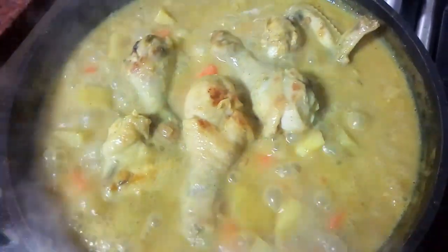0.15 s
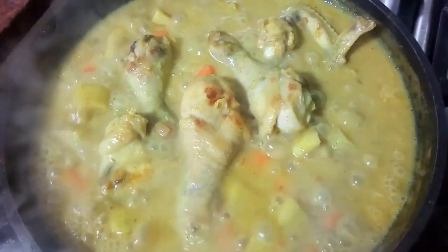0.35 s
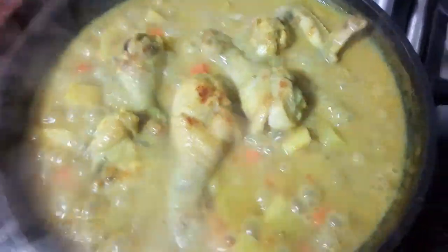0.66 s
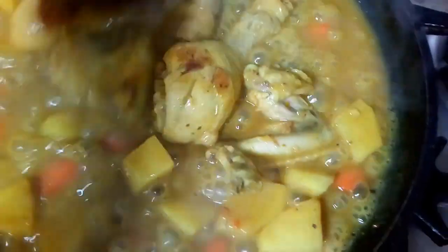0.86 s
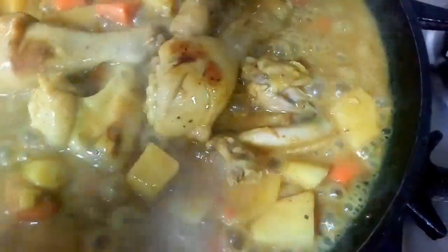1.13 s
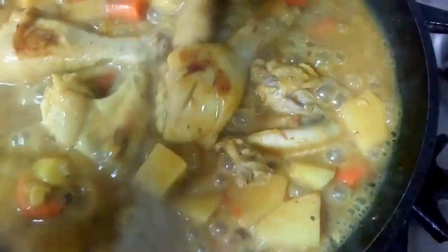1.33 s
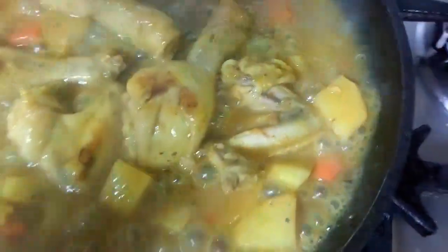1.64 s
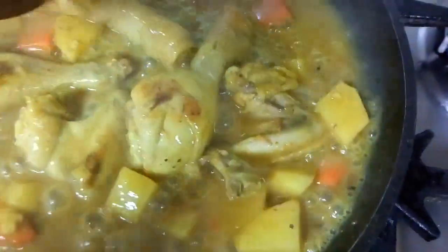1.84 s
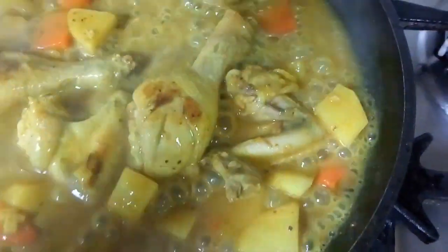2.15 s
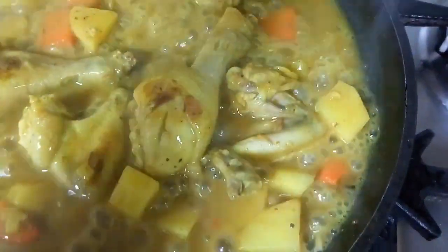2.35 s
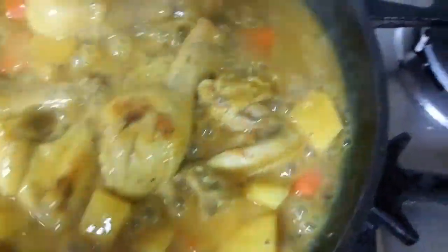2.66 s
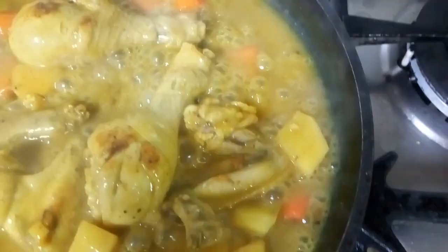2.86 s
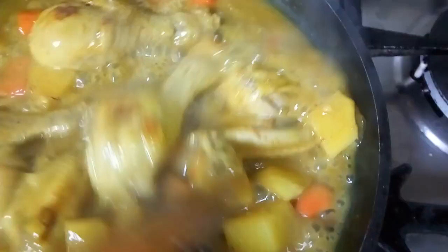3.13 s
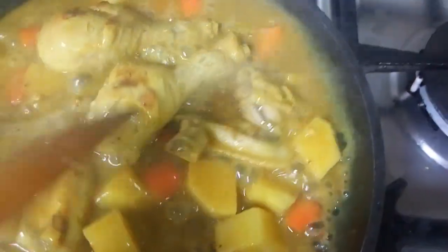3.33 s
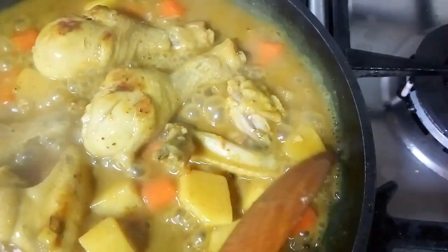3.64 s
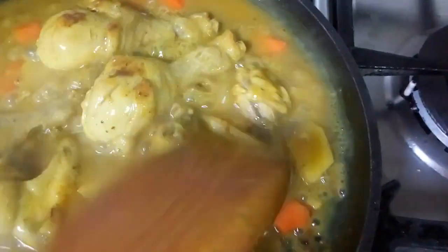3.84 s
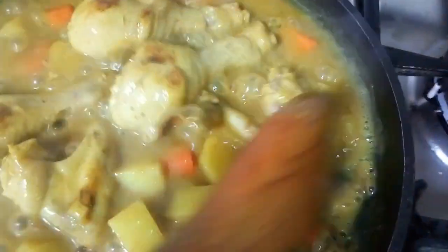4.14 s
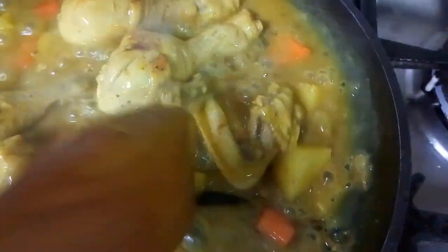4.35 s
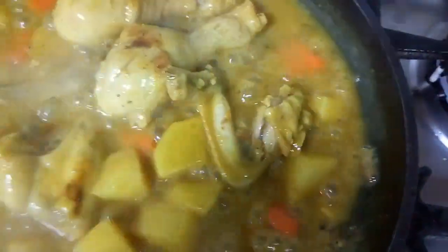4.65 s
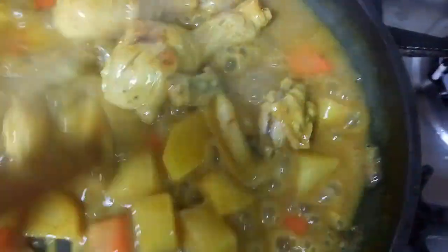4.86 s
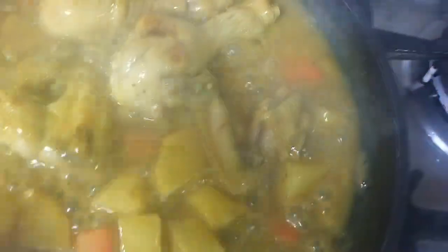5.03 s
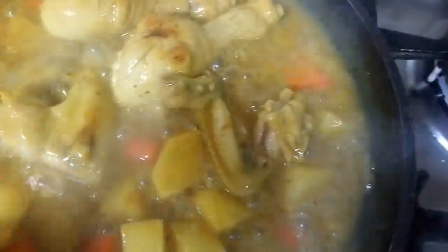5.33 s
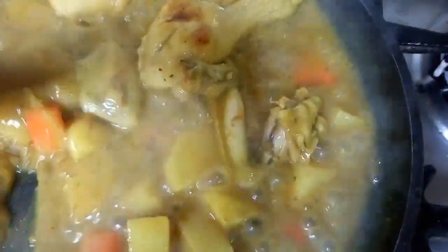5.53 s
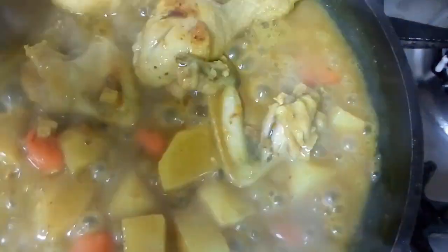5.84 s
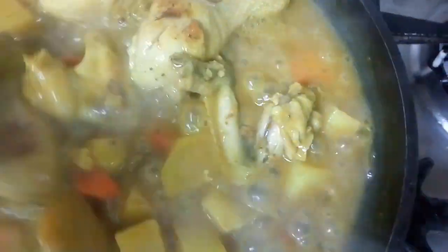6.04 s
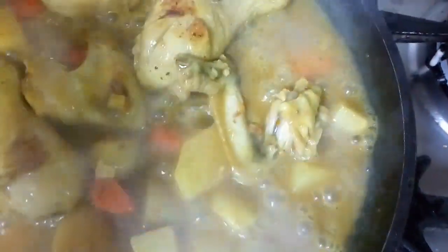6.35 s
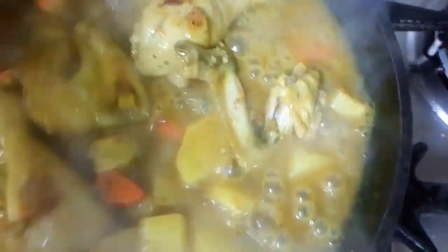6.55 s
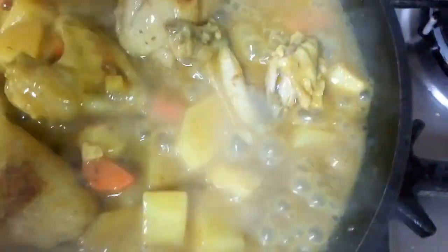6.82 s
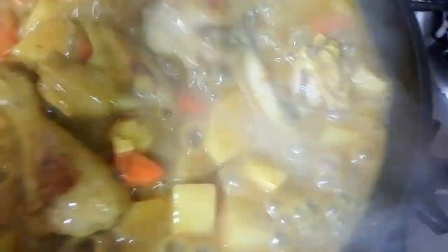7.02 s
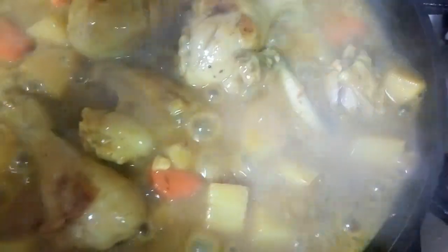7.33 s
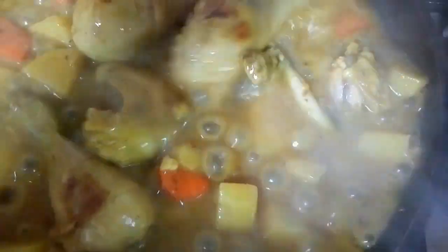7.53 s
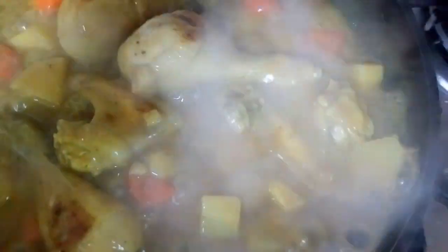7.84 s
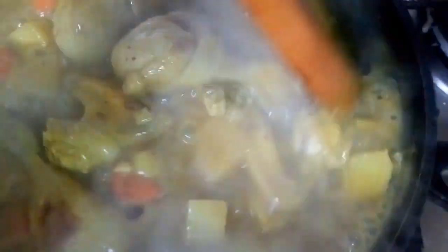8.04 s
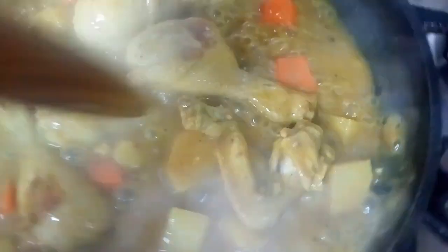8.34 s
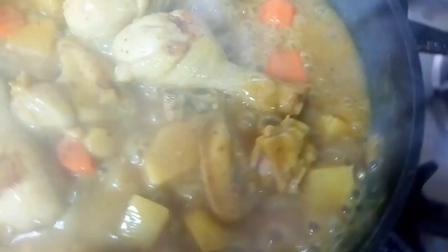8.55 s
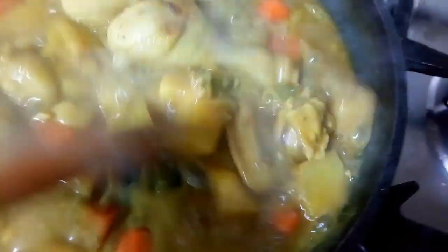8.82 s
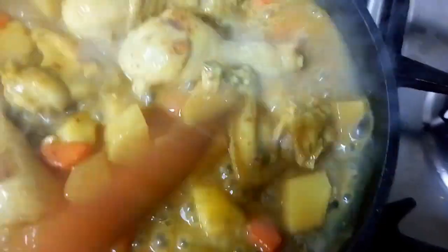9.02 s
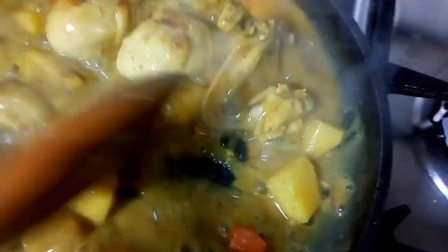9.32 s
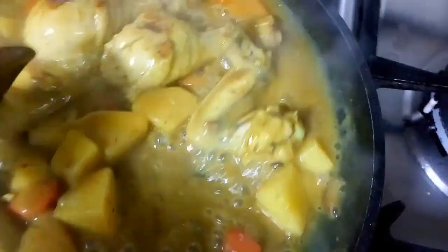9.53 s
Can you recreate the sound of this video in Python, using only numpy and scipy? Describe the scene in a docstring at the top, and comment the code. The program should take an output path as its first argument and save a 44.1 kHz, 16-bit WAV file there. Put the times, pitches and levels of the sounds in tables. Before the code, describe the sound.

Thick curry simmers in a wide pan with soft bubble pops and fizzing steam while a wooden spoon knocks dully on the pan floor.

```python
"""Thick curry simmers in a wide pan on a gas hob, close under a two-port microphone. First bubbles burst softly
and steam fizzes, as noise with grains of damped sines; single bubbles stand out. At 0.718 s the balance jumps
as if heard from nearer, and a wooden spoon begins to knock the pan floor, as ringing modes of pan and spoon, a
noise tick and diffuse ringing of pan and hob. The burble swells after firm knocks. Throughout, short flares
spit where sauce meets bared hot metal, as crackle and hiss in a narrow or broad band."""
import sys
import numpy as np
from scipy import signal
from scipy.fft import rfft, irfft, next_fast_len
from scipy.io import wavfile
from scipy.ndimage import uniform_filter1d, map_coordinates

SR = 44100
rng = np.random.default_rng(int(sys.argv[2]) if len(sys.argv) > 2 else 0)


def generate_wav(sig):
    """Save sig (samples, or channels by samples) to the path in sys.argv[1] as 16-bit PCM at SR."""
    pcm = np.round(np.clip(np.atleast_2d(sig).T, -1, 1) * 32767).astype(np.int16)
    wavfile.write(sys.argv[1], SR, pcm)


N = 426873


def amp(db):
    """dB to gain."""
    return 10 ** (np.asarray(db) / 20)


def unit(x):
    """Scale to rms 1."""
    return x / np.sqrt(np.mean(x ** 2) + 1e-20)


def along(points, hz):
    """Read (frequency, value) points on a log frequency axis."""
    point_hz, value = np.transpose(points)
    return np.interp(np.log(hz + 1), np.log(point_hz + 1), value)


def curves(rows):
    """Interpolate each column after the time to one value per sample."""
    s, *columns = np.transpose(rows)
    return [np.interp(np.arange(N) / SR, s, column) for column in columns]


def filtered(x, response):
    """Multiply the spectrum of x by a response of frequency."""
    size = next_fast_len(N + SR // 2)
    return irfft(rfft(x, size) * response(np.fft.rfftfreq(size, 1 / SR)), size)[..., :N]


def wobble(rate):
    """A smooth random curve with rate knots a second."""
    knots = rng.standard_normal(int(N * rate / SR) + 4)
    return map_coordinates(knots, [np.arange(N) * rate / SR])


# How alike diffuse sound is at the two ports: (frequency [Hz], likeness [0 to 1])
PORT_LIKENESS = [(30, 0.1), (150, 0.83), (400, 1), (1000, 0.82), (2500, 0.038), (6000, 0.015)]


def rush(patchy_db):
    """Stereo noise with time-frequency patches of random gain, most alike at the ports near 400 Hz."""
    z = signal.stft(rng.standard_normal((2, N)), nperseg=256)[2]
    field = uniform_filter1d(rng.standard_normal(z.shape[1:]), size=6, axis=0)
    field = uniform_filter1d(field, size=8, axis=1)
    pair = signal.istft(z * amp(patchy_db * unit(field)), nperseg=256)[1][:, :N]

    def mid_side_gain(hz):
        angle = np.arccos(np.clip(along(PORT_LIKENESS, hz), -1, 1)) / 2
        return np.array([np.cos(angle), np.sin(angle)])

    mid, side = filtered(pair, mid_side_gain)
    return unit(np.array([mid + side, mid - side]))


def burst(s, gain, hz, pan_db, cycles, rise, size):
    """Bubbles are damped sines with a soft start whose pitch climbs as the cavity opens."""
    turns = hz[:, None] * np.arange(size) / SR
    u = turns / cycles
    envelope = np.e * u * np.exp(-u)  # peaks at 1
    wave = gain[:, None] * envelope * np.sin(2 * np.pi * turns * (1 + rise * np.minimum(u, 4)))

    def port(side):
        # off centre, one port is louder and hears the bubble first
        start = np.abs(np.round(s * SR - side * pan_db)).astype(int)
        at = start[:, None] + np.arange(size)
        heard = wave * amp(side * pan_db / 2)[:, None]
        return np.bincount(at.ravel(), heard.ravel(), N + size)[:N]

    return np.array([port(1), port(-1)])


def swarm(count, centre_hz, spread, cycles, scatter_db, size):
    """Many small bubbles burst at random places across the pan; a few are bigger than the rest."""
    when, big, pitch, place = rng.random((count, 4)).T
    hz = centre_hz * np.exp(spread * (2 * pitch - 1))
    bigger_db = scatter_db * np.minimum(-np.log(1 - big), 4)
    return unit(burst(when * N / SR, amp(bigger_db), hz, 24 * (place - 0.5), cycles, 0.06, size))


# Pitches favoured by the air in the pan and under the hood: (centre [Hz], width [Hz], boost [dB])
AIR_RESONANCES = [(264.6, 21, 6.5), (363.5, 31, 7.5), (730, 48, 6), (849, 62, 7.5), (1363, 310, 7),
                  (1596, 63, 9)]


def hollow(hz):
    """The enclosed air boosts its resonances, as a gain over frequency."""
    return amp(sum(db / (1 + (2 * (hz - centre) / width) ** 2) for centre, width, db in AIR_RESONANCES))


def layer(spectrum, grains, grain_db, patchy_db):
    """Grains of bursting bubbles and a bed of noise take one spectrum and the hollow of the air."""
    mixed = rush(patchy_db) + amp(grain_db) * grains
    return unit(filtered(mixed, lambda hz: amp(along(spectrum, hz)) * hollow(hz)))


BURBLE_DB = -61.5  # low burble at rest, before seething
SLOSH_DB, SLOSH_S = 1, 0.13  # rise of the burble after a knock [dB], time to its top [s]
SLOSH_FROM_DB = -50  # knocks at or below this level leave the sauce still


def burble_db():
    """The sauce sloshes up after every firm knock and settles."""
    s = np.arange(0, N / SR, 0.005)
    firm_s = np.array([knock[0] for knock in SPOON_KNOCKS if knock[1] > SLOSH_FROM_DB])
    u = np.maximum(s - firm_s[:, None], 0) / SLOSH_S
    slosh = (u * np.exp(1 - u)).sum(axis=0)
    return curves(np.transpose([s, BURBLE_DB + SLOSH_DB * slosh]))[0]


# The simmer before seething, in two lists, farther then nearer:
# (time [s], bubbling level [dB], sizzle level [dB])
SIMMER_LEVELS = [
    [(0.0, -57.5, -62.5), (0.33, -59, -62.5), (0.622, -60, -61.5), (0.716, -58, -63)],
    [(0.72, -50, -55.5), (0.92, -60, -53.5), (1.17, -62, -56), (1.44, -54.5, -54.5), (1.72, -63.5, -56.5),
     (2.02, -60.5, -54.5), (2.47, -65, -56.5), (3.01, -56.5, -55), (3.51, -64, -56), (4.24, -59, -56),
     (4.64, -66.5, -56.5), (4.84, -55, -53.5), (5.14, -62, -56), (5.4, -56, -54.5), (5.86, -66, -55),
     (6.1, -55.5, -54.5), (6.73, -62, -56), (7.15, -54.5, -55.5), (7.68, -59.5, -56.5), (8.93, -63, -56),
     (9.68, -75, -54.5)],
]
# Spectra of burble, bubbling, sizzle and fine spray: (frequency [Hz], relative response [dB])
BURBLE_SPECTRUM = [(12, -53), (20, -16.5), (86, -3.5), (173, -3.5), (257, -8), (344, -4), (381, -19),
                   (408, -5), (444, -10.5), (605, -6), (718, -21), (769, -15), (1200, -13.5), (1560, -44),
                   (2640, -120)]
BUBBLING_SPECTRUM = [(410, -43), (700, 5.5), (886, -1.5), (948, 0.5), (1300, -2), (2070, 1.5), (2780, -5),
                     (3040, -25), (3500, 0), (4550, -39), (7700, -120)]
SIZZLE_SPECTRUM = [(1470, -3.5), (2500, -1), (3520, -3), (4030, -0.5), (4370, -1.5), (6180, 1), (6560, 0.5),
                   (8090, -16), (9000, -13), (11700, -20.5), (19800, -120)]
SPRAY_SPECTRUM = [(4410, -24), (7500, -3.5), (8220, -10), (13400, -14), (14900, -6), (15600, -6)]
NEARER_S = 0.718  # from here the pan is heard as if from nearer
SPRAY_FAR_DB, SPRAY_NEAR_DB = -11.5, -9  # fine spray relative to the sizzle


def simmer():
    """Sauce and flame burble low, bubbles burst, the rim sizzles and sprays; all seethe up and down together."""
    bubbling_db, sizzle_db = curves(sum(SIMMER_LEVELS, []))
    is_far = np.arange(N) < NEARER_S * SR
    spray_db = sizzle_db + np.where(is_far, SPRAY_FAR_DB, SPRAY_NEAR_DB)
    seethe = wobble(11) + 1.75 * wobble(40)
    calm = 0.45 * seethe  # the thick sauce heaves less than the fizz

    blobs = swarm(count=900, centre_hz=398.6, spread=0.827, cycles=1.24, scatter_db=0.5, size=900)
    burble = layer(BURBLE_SPECTRUM, blobs, grain_db=-16.5, patchy_db=1.0)

    blips = swarm(count=6000, centre_hz=1400, spread=0.7, cycles=1.2, scatter_db=1.6, size=400)
    blips = unit(blips * amp(2.2 * wobble(25)))  # they come in flurries
    bubbling = layer(BUBBLING_SPECTRUM, blips, grain_db=-6.5, patchy_db=1.5)

    crackle = swarm(count=9000, centre_hz=7500, spread=0.8, cycles=0.6, scatter_db=2.2, size=60)
    sizzle = layer(SIZZLE_SPECTRUM, crackle, grain_db=-7.0, patchy_db=2.5)
    spray = layer(SPRAY_SPECTRUM, crackle, grain_db=-5.0, patchy_db=5.0)

    sauce = amp(burble_db() + calm) * burble + amp(bubbling_db + calm) * bubbling
    fizz = amp(sizzle_db + 0.64 * seethe) * sizzle + amp(spray_db + 0.12 * seethe) * spray
    return sauce + fizz


# Big bubbles bursting: (time [s], peak level before panning [dB], starting pitch [Hz], left-right [dB])
BIG_BUBBLES = [(0.037, -45, 1180, 0), (0.065, -44, 1330, 3), (0.248, -40, 1360, 1), (0.546, -42, 1060, 3),
               (0.612, -47, 1450, 4), (0.075, -40, 1300, 1), (0.177, -52, 2100, 3), (0.205, -48, 1200, 0),
               (0.328, -51, 1300, 0), (0.341, -44, 1100, 3), (0.35, -43, 1400, 1), (0.456, -48, 1700, 2),
               (0.493, -43, 1250, 1), (0.519, -45, 1650, 2), (0.566, -40, 1490, 1), (0.584, -42, 1390, 1.5),
               (0.689, -46, 1100, 1), (4.836, -41, 4300, -3), (4.912, -43, 5960, 1), (3.115, -43, 1340, 2),
               (5.326, -37, 4050, -1), (6.182, -43, 880, -4), (0.634, -42, 1130, 9),
               (1.428, -35.5, 5100, -10), (1.957, -41, 1430, -3.5), (2.063, -32, 1420, 0.5),
               (2.07, -37.5, 1400, -12), (2.095, -44, 1500, 1), (2.699, -41, 5670, 5),
               (1.049, -45, 1360, 3), (1.83, -39, 6440, 1), (1.867, -44, 2100, 4.5),
               (1.898, -46, 5700, 1.5), (2.021, -44, 5140, -1.5), (2.226, -43, 1540, 2),
               (2.306, -43, 6100, 5), (2.565, -43.5, 1610, 3), (2.645, -44, 2170, 3),
               (2.798, -43, 1960, -2.5), (2.816, -39, 5500, 3.5), (3.033, -43.5, 1570, -3.5),
               (3.193, -39, 4550, 4.5), (3.787, -42, 5700, 5), (3.806, -42.5, 990, 0),
               (3.919, -42, 1190, 1.5), (3.988, -45, 6420, 2), (4.148, -49, 4200, -5),
               (4.274, -39, 5800, 5), (4.454, -43, 6850, 4.5), (4.504, -44, 6400, 2.5),
               (5.133, -46, 5900, -3), (5.255, -42, 2360, -0.5), (5.521, -40, 4200, -2),
               (5.625, -42, 5650, 1), (5.735, -45, 1060, 0), (6.73, -43, 1160, -1.5), (6.8, -43, 1340, 1),
               (7.029, -41, 5840, -5), (7.051, -40, 5830, 1.5), (7.136, -44, 1400, 2),
               (7.697, -49, 2410, 0), (7.882, -44, 1560, 1.5), (8.716, -44, 5520, 6), (8.958, -47, 4500, 5),
               (9.017, -44, 6200, 6), (9.219, -40, 1960, 2.5), (9.316, -43, 4550, 4),
               (3.124, -32, 5900, 1.5), (4.896, -40, 1180, -1), (5.132, -44, 694, -1),
               (5.327, -37, 2820, 5), (7.0235, -42, 2080, -2), (7.051, -41, 980, -1),
               (7.106, -36.5, 3400, -7.5), (7.203, -38, 1440, -16.5), (7.632, -42, 6120, -1.5),
               (7.7298, -39, 5380, 2), (7.812, -40, 6340, 11), (8.09, -41, 1210, 1.5),
               (8.1025, -39, 4470, 6), (8.145, -31.5, 1230, 0.5), (8.158, -46, 1330, -3),
               (8.172, -47, 1330, 0), (8.2543, -37, 6000, 3)]


def pops():
    """Single bubbles stand out; higher ones ring for more cycles."""
    s, db, hz, pan_db = np.transpose(BIG_BUBBLES)
    cycles = 0.9 * (hz[:, None] / 1500) ** 0.65
    return burst(s - 0.001, amp(db), hz, pan_db, cycles, rise=0.02, size=1200)


# Sauce on bared hot metal: (time [s], rms level before shaping [dB], centre [Hz], decay length [s],
# breadth [log ratio], relative level of spray [dB])
HOT_METAL_FLARES = [(0.198, -56, 2440, 0.033, 0.62, -31), (0.241, -54, 3720, 0.041, 0.16, -41),
                    (0.717, -53.5, 2120, 0.17, 0.43, -26), (1.413, -49, 5530, 0.11, 0.63, -19),
                    (2.078, -52.5, 3200, 0.037, 0.31, -31), (3.063, -46.5, 6060, 0.035, 0.49, -25),
                    (3.11, -45, 6000, 0.049, 0.53, -22), (4.666, -53, 4080, 0.085, 1, -21),
                    (4.74, -49, 2080, 0.029, 0.3, -32), (4.757, -43, 3900, 0.04, 0.39, -19),
                    (4.776, -49.5, 4700, 0.06, 0.6, -20), (4.787, -50.5, 2150, 0.067, 0.29, -32),
                    (4.893, -46, 6100, 0.018, 0.42, -30), (5.124, -50.5, 5600, 0.061, 0.99, -20),
                    (5.215, -54, 2180, 0.089, 0.55, -18), (5.305, -49, 2500, 0.02, 0.6, -25),
                    (5.319, -36.5, 3600, 0.011, 0.99, -23), (5.334, -48, 4300, 0.033, 1, -25),
                    (5.352, -55.5, 2100, 0.19, 0.45, -30), (5.496, -52.5, 4230, 0.053, 0.31, -20.5),
                    (6.2, -54, 3420, 0.081, 0.22, -35), (6.531, -46, 5250, 0.031, 0.97, -10),
                    (7.038, -50.5, 2240, 0.062, 0.99, -19), (7.106, -35.5, 3820, 0.0077, 0.76, -15),
                    (7.113, -47, 4730, 0.054, 0.71, -24), (7.525, -58.5, 4660, 0.11, 0.06, -38),
                    (7.697, -54, 2470, 0.038, 0.06, -40), (7.803, -58, 4350, 0.048, 0.07, -40),
                    (7.69, -58.5, 2560, 0.12, 1, -13), (7.942, -56, 4620, 0.048, 0.78, -13),
                    (8.106, -53, 4700, 0.045, 0.73, -17), (8.2, -53.5, 6160, 0.044, 0.93, -14),
                    (8.763, -53, 5200, 0.057, 0.42, -24), (9.204, -43.5, 6000, 0.018, 0.38, -24),
                    (9.298, -53.5, 4700, 0.069, 0.99, -17)]
FLARE_PAN_DB = -2  # left-right


def flares():
    """Sauce boils off bared metal as dense crackle and hiss in a band, narrow or broad, with a fast start."""
    crackle = swarm(count=20000, centre_hz=6300, spread=0.64, cycles=0.16, scatter_db=6.0, size=60)
    steam = unit(rush(patchy_db=1.5) + amp(-5) * crackle)
    out = np.zeros((2, N + SR))
    t = np.arange(SR // 4) / SR
    hz = np.fft.rfftfreq(len(t), 1 / SR)
    port_db = np.array([[0.5], [-0.5]]) * FLARE_PAN_DB
    for s, db, centre_hz, length, breadth, spray_db in HOT_METAL_FLARES:
        start = round(s * SR)
        band = np.exp(-(np.log((hz + 1) / centre_hz) / breadth) ** 2) / (1 + (hz / 7300) ** 12)
        band = band + amp(spray_db) * (hz > 7600)
        piece = steam[:, start:][:, :len(t)]
        hiss = unit(irfft(rfft(piece, len(t)) * band, len(t)))
        shape = (1 - np.exp(-t / 0.0079)) * np.exp(-(t / length) ** 2)
        out[:, start:][:, :len(t)] += amp(db + port_db) * shape * hiss
    return out[:, :N]


# Decay of the diffuse ringing of pan and hob: (frequency [Hz], t60 [s])
HOB_DECAY = [(80, 0.26), (200, 0.4), (500, 0.51), (1200, 0.34), (4000, 0.057)]


def hob_ringing(x):
    """Pan and hob ring on diffusely, delayed and partly shared by the ports; each frequency has its own t60."""
    hz, t, z = signal.stft(rng.standard_normal((2, SR // 2)), SR, nperseg=512)
    decay = amp(-60 * t / along(HOB_DECAY, hz)[:, None])
    tail = signal.istft(z * decay, SR, nperseg=512)[1]
    tail[1] = tail[0] + 0.6 * tail[1]
    tail = tail / np.linalg.norm(tail, axis=1)[:, None]
    return signal.fftconvolve(np.pad(x, (500, 0))[None], tail, axes=1)


# Spoon on the pan floor: (time [s], level near 245 Hz [dB], then relative levels near 75, 155, 350, 440,
# 580, 720, 880 and 1100 Hz and of the tick [dB], rise [s], rise of the tick [s],
# length of ring [share], pitch of the top modes [ratio])
SPOON_KNOCKS = [(0.717, -39, -16, -10, -1.5, 1.5, -5, -6.5, -3.5, -14, -22, 0.0011, 0.0042, 1, 1.1),
                (0.725, -37, -25, -17, -3, 1, -3, -12, -12, -16, -32, 0.0032, 0.0027, 0.76, 1),
                (1.276, -50, -12, 0.5, -8, -18, -19, -19, -17, -23, -36, 0.0047, .002, 0.4, 0.91),
                (2.934, -32.5, -21, -17, -3, -10, -12, -15, -8.5, -21.5, -36, 0.0076, 0.0093, 0.91, 0.9),
                (4.163, -24, -27, -16, -15, -13.5, -14.5, -16, -13.5, -14, -25, 0.011, 0.011, 0.94, 1.09),
                (5.015, -68.5, 9, -12, -15, -15, 5, 4, 17, -5, -3, 0.0055, 0.0042, 0.72, 0.71),
                (5.19, -38, -25, -15, 3, -5.5, -10, -1.5, -20, -26, -30, 0.0071, 0.0031, 0.97, 1),
                (5.302, -39.5, -26, -7, 2.5, -12, -6.5, -8, -9, -22, -26, 0.0077, 0.0037, 0.86, 0.88),
                (5.838, -47.5, -20, -15, -5.5, -6.5, -17, -15, -11, -36, -32, 0.0093, 0.007, 1.6, 0.91),
                (6.401, -35.5, -24, -20, -8, -4, -11.5, -13.5, -10, -23, -53, 0.0052, 0.0022, 0.99, 0.89),
                (6.888, -28, -30.5, -18, -16, -5, -16.5, -15.5, -27, -26, -42, 0.0063, .008, 0.92, 1),
                (7.283, -57, -14, -8, -3, -2, 6, 2, 2, -8, -31, 0.0027, .002, 0.77, 1),
                (7.2988, -22, -26, -18.5, -10.5, -5, -10, -16.5, -15.5, -19.5, -28, 0.00898, 0.0021, 0.8, 1.05),
                (7.986, -41, -16, -17, -10, -24, -24, -17, -20, -30, -33, 0.00386, .004, 0.24, 1),
                (7.999, -46.5, -2, -6, -15, -18, -24, -27, -20, -24, -33, 0.0024, .004, 0.3, 1),
                (8.088, -61, -20, -18, -2, -9, -8, 3, -1, -10, -25, 0.00085, .001, 0.37, 1),
                (8.102, -59, -20, -19, -7, -7, -2, 6.5, 7, -13, -25, 0.0018, .002, 0.35, 1),
                (8.595, -41.5, -22, -7, -1, -17, -6.5, -14, -10, -26, -44, 0.0094, 0.0071, 1.08, 1),
                (9.2363, -24, -22, -22, -13, -19, -29, -22, -24, -35, -43, 0.0059, 0.0038, 0.36, 1.2),
                (9.258, -38, -21, -5, -13, -6.5, -11, -10, -18, -37, -41, 0.0058, .003, 0.49, 0.87)]
# Light contacts, the spoon's first touch or the pan rocking back on its trivet: (time [s], level [dB])
LIGHT_CONTACTS = [(2.921, -54), (6.878, -55), (8.583, -58), (9.224, -52), (0.756, -47), (0.834, -54),
                  (1.321, -58), (2.997, -47), (4.234, -44), (4.298, -52), (5.345, -51), (6.462, -52),
                  (6.493, -55), (6.943, -48), (7.451, -47), (7.957, -60), (8.632, -50), (8.66, -53),
                  (9.29, -51)]
# Their remaining knock columns, the same for every light contact
LIGHT_CONTACT_COLOUR = [-19, 1, -8, -11, -15, -15, -16, -22, -28, .008, .004, .65, 1]
# Modes of the pan full of sauce, and above about 2400 Hz of the wooden spoon: (frequency [Hz], level [dB],
# nominal t60 [s])
KNOCK_MODES = [(68.1, 6.5, 0.54), (124.1, 0, 0.61), (159.7, 10.5, 0.37), (208.5, 7.5, 0.12),
               (244.5, 4.5, 0.19), (296, -2.5, 0.2), (350, 7.5, 0.19), (360, -2, 0.099), (432.8, 5.5, 0.28),
               (517.4, -1.5, 0.43), (568, 4.5, 0.23), (661.7, -0.5, 0.32), (736, 2, 0.46), (832, 3, 0.23),
               (922, 1, 0.27), (1022, -2.5, 0.34), (1070, 5, 0.31), (1202, 1, 0.3), (1444, 2, 0.37),
               (1650, 1, 0.16), (1820, 5, 0.15), (1987, 12, 0.28), (2135, 15.5, 0.11), (2620, 14.5, 0.031),
               (3630, 4, 0.022), (4320, 7, 0.025)]
# How unevenly a mode reaches the two ports: (frequency [Hz], share)
PORT_UNEVENNESS = [(200, .08), (400, .2), (700, .42), (1000, .5), (1600, .9)]
# Low and high part of the tick in the mode levels, relative to the tick column: [dB]
TICK_PARTS_DB = [-8, 5.5]
COLOUR_HZ = [75, 155, 245, 350, 440, 580, 720, 880, 1100, 1950, 2900]
BASS_RISE_S = 0.013  # the lowest modes swell this much later
PUSH, SHIFT = 0.9, 0.018  # moment of the hardest push [rise times], scatter of the upper modes' pitch [share]
SNAP_DB, SNAP_T60 = 9, 0.03  # woody snap within the tick [dB], its t60 [s]
REST_DB, ROOM_DB = -3.5, -15  # after-ring and diffuse ringing, each relative to the blow
SPOON_LAG = 7  # samples of the ports' lag that the spoon's place takes back


def spoon():
    """Each knock rings the pan; sauce soaks up most of the swing, a wavering rest and diffuse ringing go on."""
    out = np.zeros((2, N + 3 * SR))
    t = np.arange(SR // 2) / SR
    mode_hz, level_db, mode_t60 = np.transpose(KNOCK_MODES)[:, :, None]
    count = len(KNOCK_MODES)
    knots = np.cos(np.pi / 2 * np.clip(60 * t - np.arange(32)[:, None], -1, 1)) ** 2  # smooth joins, 60 a second
    wood = signal.butter(2, [1000, 5500], "bandpass", fs=SR, output="sos")
    contacts = SPOON_KNOCKS + [(*touch, *LIGHT_CONTACT_COLOUR) for touch in LIGHT_CONTACTS]
    for s, db, *body_db, tick_db, rise, tick_rise, share, ratio in contacts:
        colour_db = np.insert([*body_db, *np.add(tick_db, TICK_PARTS_DB)], 2, 0)  # 0 dB near 245 Hz
        tilt_db = along(list(zip(COLOUR_HZ, colour_db)), mode_hz)

        # the sauce lies differently each time; the top modes move with the grip
        load = 1 + SHIFT * rng.standard_normal((count, 1)) * (mode_hz > 480)
        hz = mode_hz * load * np.where(mode_hz > 2400, ratio, 1)
        t60 = mode_t60 * share
        luck = rng.standard_normal((count, 3)) * [1, 0.025, 1]  # level [dB], pitch [share], lean
        waver = rng.standard_normal((count, len(knots))) @ knots

        # the modes swing together when the spoon pushes hardest
        since = t - PUSH * np.where(hz > 1500, min(tick_rise, rise), rise)
        first = amp(-60 * np.abs(since) / (0.49 * t60)) * np.sin(2 * np.pi * hz * since)
        rest_gain = min(share, 1) ** 2 * amp(REST_DB + 2.6 * waver - 60 * t / (1.14 * t60))
        drift = 1.63 * (waver - waver[:, :1])  # phase [rad]
        rest = rest_gain * np.sin(2 * np.pi * hz * (1 + luck[:, 1:2]) * since + drift)

        contact = np.where(hz > 1500, tick_rise, rise) + BASS_RISE_S * (hz < 190)
        swell = 1 - np.exp(-(t / contact) ** 2)  # the spoon sinks in
        way = np.where(hz < 270, 1, np.sign(waver[:, :1]))  # the floor gives as one, higher modes either way
        ring = way * amp(level_db + tilt_db + luck[:, :1]) * swell * (first + rest)

        snap = amp(SNAP_DB - 60 * np.abs(t - tick_rise) / SNAP_T60)
        tick_shape = (amp(-3.5 - 60 * t / 0.69) + snap) * (1 - np.exp(-(t / tick_rise) ** 3))
        wood_noise = unit(signal.sosfilt(wood, rng.standard_normal((2, len(t)))))
        tick = amp(tick_db) * tick_shape * wood_noise

        lean = (luck[:, 2] * along(PORT_UNEVENNESS, mode_hz[:, 0])) @ ring
        blow = amp(db) * (ring.sum(axis=0) + [[1], [-1]] * lean + tick)
        diffuse = hob_ringing(blow.mean(axis=0))
        start = round(s * SR)
        out[:, start:][:, :len(t)] += blow
        out[:, start:][:, :diffuse.shape[1]] += amp(ROOM_DB) * diffuse
    return np.array([out[0, SPOON_LAG:][:N], out[1, :N]])


def scene():
    """Simmer, single bubbles, flares and spoon together."""
    return simmer() + pops() + flares() + spoon()


# Left-right level of the two ports: (frequency [Hz], level difference [dB])
PORT_LEAN = [(100, 1), (600, -1.5), (2000, -4.5), (4500, -2), (9000, 1), (13000, -7.5)]
LAG = 11  # samples by which the left port hears later
TOP_HZ = 15757  # upper band limit of the microphone


def record(dry):
    """The right port hears first and louder in the upper mids and top; nothing passes above the band limit."""
    side = np.array([[1], [-1]])

    def ports(hz):
        lean = amp(side * along(PORT_LEAN, hz) / 2)
        delay = np.exp(-1j * np.pi * side * hz * LAG / SR)
        return (hz < TOP_HZ) * lean * delay

    return filtered(dry, ports)


dry = scene()
out = record(dry)
generate_wav(out)
```